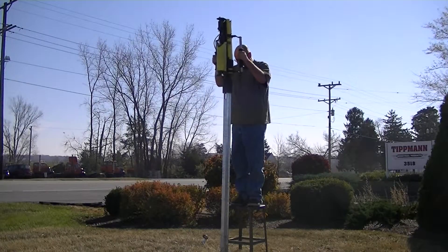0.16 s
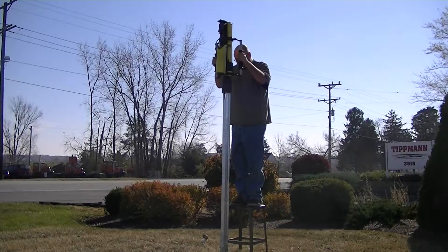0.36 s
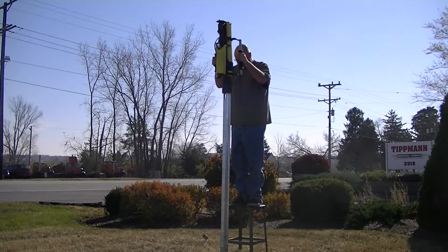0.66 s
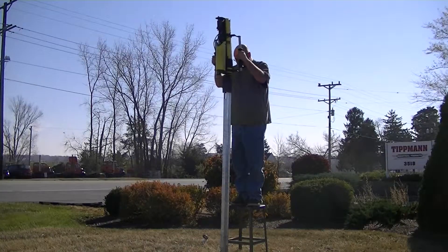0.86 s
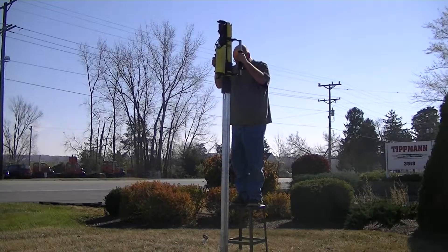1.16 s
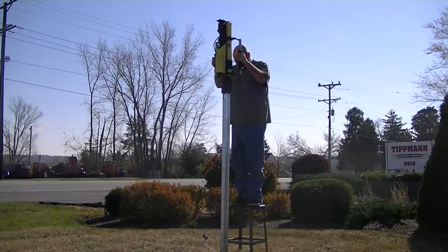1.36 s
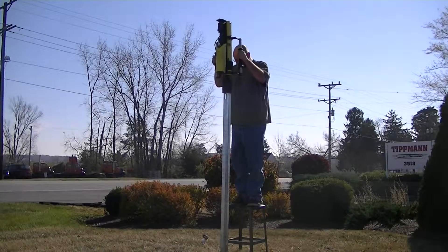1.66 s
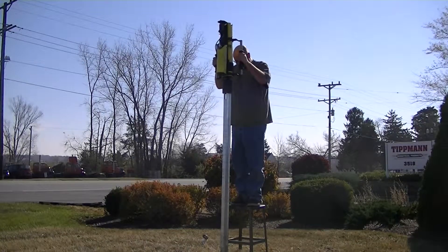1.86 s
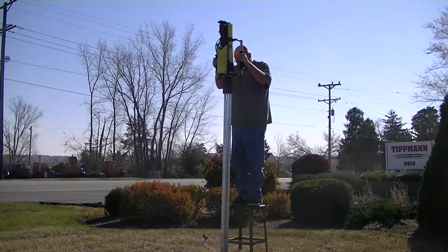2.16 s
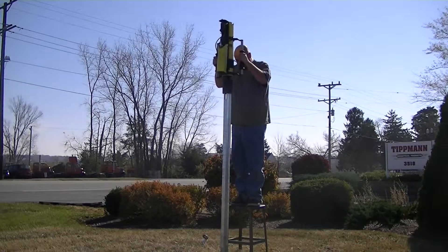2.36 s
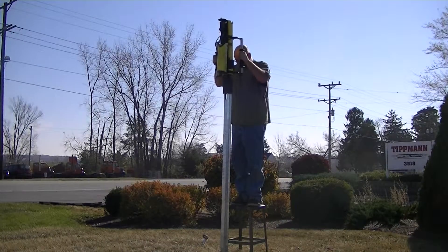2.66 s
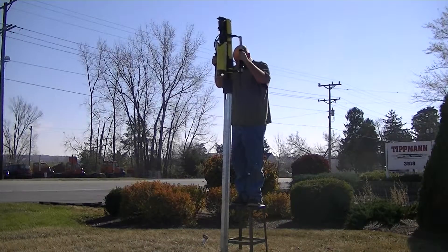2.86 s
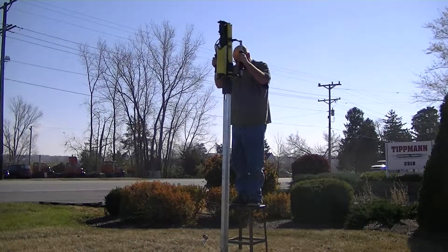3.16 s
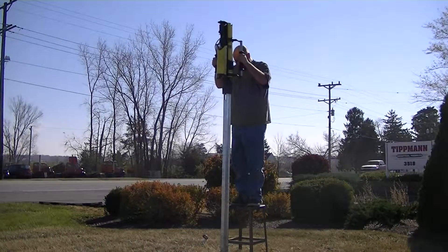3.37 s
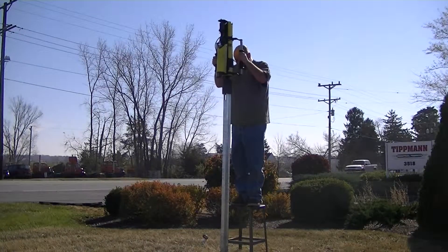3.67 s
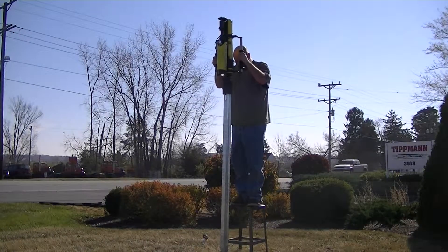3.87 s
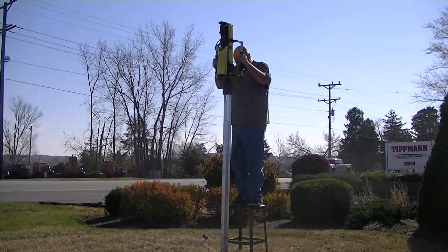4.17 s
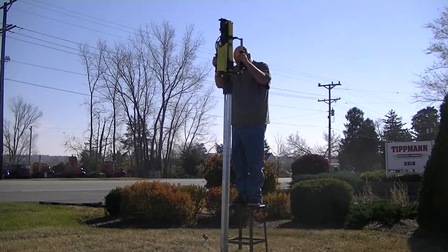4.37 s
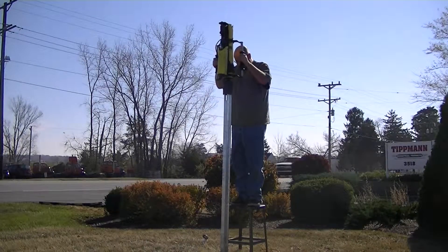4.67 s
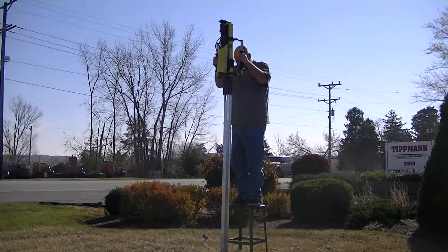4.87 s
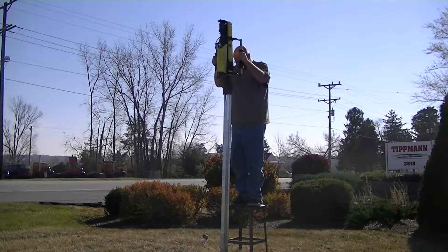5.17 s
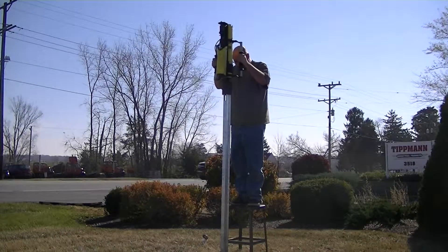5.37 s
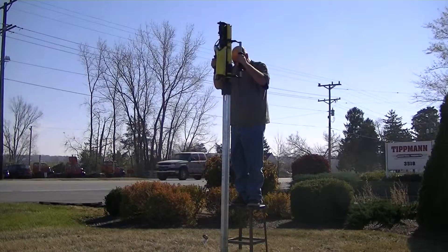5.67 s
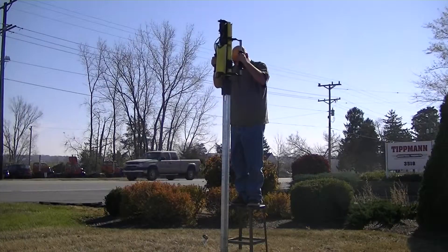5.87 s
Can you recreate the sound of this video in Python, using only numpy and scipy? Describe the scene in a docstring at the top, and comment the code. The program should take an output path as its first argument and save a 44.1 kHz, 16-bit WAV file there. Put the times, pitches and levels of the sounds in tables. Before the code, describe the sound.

Close outdoors on a lawn, a gas-powered driver pounds a steel pipe about three times a second. Each stroke has a brief gas intake, a hard explosive pop, bright steel ringing, a clank just after, then a hiss, small ticks and a thin jingle. The driver bounces lightly on the pipe between strokes. Faint traffic and dull building echoes lie behind; stereo leans right, with the loudest bangs slightly overloaded.

```python
"""Gas-powered post driver on a steel pipe

A post driver sits on a steel pipe on a lawn and fires about three times a second.
Each stroke: gas rushes in (swelling noise), the charge bangs (a pressure pulse and ringing exhaust modes), the
hammer rings the steel (beating modes), clanks back (ragged noise), and the chamber vents with a hiss.
The recoiling driver lands on the pipe and bounces, a small part jingles and one pipe mode sings on;
a building echoes the driver, and a road murmurs behind as slowly swelling noise."""
import sys
import numpy as np
from scipy import signal
from scipy.fft import rfft, irfft, next_fast_len
from scipy.io import wavfile
from scipy.ndimage import map_coordinates

SR = 44100
rng = np.random.default_rng(int(sys.argv[2]) if len(sys.argv) > 2 else 0)


def dump(signal):
    """Clip the signal to [-1, 1] and save it as 16-bit WAV at the path in sys.argv[1]."""
    limited = np.clip(np.atleast_2d(signal).T, -1, 1)
    pcm = np.round(limited * 32767).astype(np.int16)
    wavfile.write(sys.argv[1], SR, pcm)


N = 265482  # length in samples


def amp(db):
    """Decibels to gain."""
    return 10 ** (np.asarray(db) / 20)


def unit(x):
    """Scale to rms 1."""
    return x / np.sqrt(np.mean(x ** 2) + 1e-20)


def along(points, hz):
    """Read (Hz, value) points on a log frequency axis."""
    point_hz, values = np.transpose(points)
    return np.interp(np.log(hz + 1), np.log(point_hz), values)


def curve(rows):
    """One value per sample from (seconds, value) rows."""
    return np.interp(np.arange(N) / SR, *np.transpose(rows))


def wobble(rate, size=N):
    """A smooth random curve with rate knots a second."""
    knots = rng.standard_normal(int(size * rate / SR) + 4)
    return map_coordinates(knots, [np.arange(size) * rate / SR])


def filtered(x, response):
    """Shape x by a response of frequency, zero-padded so tails do not wrap."""
    m = next_fast_len(x.shape[-1] + SR // 8)
    spectrum = rfft(x, m) * response(np.fft.rfftfreq(m, 1 / SR))
    return irfft(spectrum, m)[..., :x.shape[-1]]


def fade(t, t60):
    """A decay of 60 dB in t60 seconds."""
    return np.exp(-np.log(1000) * t / max(t60, 1e-4))


def add(track, s, sound):
    """Mix a sound into the track at s seconds."""
    i = max(round(s * SR), 0)
    part = track[:, i:i + sound.shape[-1]]
    part += sound[..., :part.shape[1]]


# How alike the two channels of a noise are. Each row: frequency in Hz, correlation (1 is identical).
LIKENESS = [(100, 0.94), (700, 0.32), (2000, 0.66), (5000, 0.46), (9000, 0.91), (15000, 0.79)]


def noise(spectrum, size=N, ripple_db=0):
    """Coloured stereo noise of rms 1; ripple gives it a fresh set of resonant humps."""
    def mid_side_response(hz):
        turn = np.arccos(np.clip(along(LIKENESS, hz), -1, 1)) / 2
        humps = ripple_db * np.interp(hz, np.linspace(0, SR / 2, 160), rng.standard_normal(160))
        return amp(along(spectrum, hz) + humps) * [np.cos(turn), np.sin(turn)]

    mid, side = filtered(rng.standard_normal((2, size)), mid_side_response)
    return unit(np.array([mid + side, mid - side]))


def partials(modes, t, split_hz, scatter_db):
    """Modes as close, beating pairs that shift and change strength from blow to blow; about rms 1."""
    hz, level = np.tile(np.transpose(modes), 2)
    hz = hz + rng.normal(0, split_hz, len(hz))
    gains = amp(level + rng.normal(0, scatter_db, len(hz)))
    start = rng.random((len(hz), 1))
    waves = np.sin(2 * np.pi * (hz[:, None] * t + start))
    return gains @ waves / np.sqrt(np.sum(gains ** 2) / 2)


# The strokes, with levels ahead of each layer's own trim.
# Each row: start in seconds, bang in dB, exhaust pitch ratio, steel in dB, singing note in dB,
# hammer return delay in seconds, return in dB, vent length in seconds, vent in dB.
BLOWS = [ (0.096, -12, 0.95, -16, -32, .079, -17, 0.17, -28.5),
         (0.514, -11.5, 1.04, -15.5, -34, 0.071, -12, 0.069, -26.5),
         (0.9038, -11, 1.01, -13.5, -34.5, 0.078, -12, 0.25, -26),
         (1.3151, -13, 1.004, -16, -35.5, 0.073, -13.5, 0.24, -31),
         (1.6583, -13, 0.97, -12, -38, .075, -14, 0.25, -28.5),
         (1.9725, -12.5, 0.96, -13, -41, 0.071, -14, .23, -27.5),
         (2.318, -11, 0.99, -16, -41, 0.073, -15, 0.23, -28.5),
         (2.6357, -12.5, 1.03, -14, -33.5, 0.073, -12, 0.18, -29),
         (2.9042, -11.5, 1.03, -11, -33.5, 0.074, -14, .23, -29),
         (3.2794, -17.5, 1.01, -14, -39.5, 0.077, -14, 0.22, -29.5),
         (3.595, -13, 0.97, -12.5, -41.5, 0.072, -15, 0.24, -27),
         (3.9155, -12, 1.036, -13, -35.5, .072, -14.5, .25, -27.5),
         (4.404, -13.5, 0.98, -14.5, -31.5, 0.08, -14, .27, -26.5),
         (4.7988, -12, 1, -10.5, -34.5, .071, -13, .26, -27.5),
         (5.1673, -10, 1.03, -10.5, -47, 0.074, -15, .26, -29),
         (5.4543, -11.5, 1.03, -14.5, -32.5, 0.072, -12, .25, -26.5),
         (5.8033, -11, 1.046, -13, -33.5, 0.072, -12, 0.18, -28)]
# Gas ringing in the exhaust, nominal tuning. Each row: frequency in Hz, level in dB, 60 dB decay in seconds.
EXHAUST_MODES = [(199.4, -4, 0.023), (458.4, -5.5, 0.034), (600, -10, 0.02), (737, -6, 0.026),
                 (815, -39.5, 0.066)]
EXHAUST_SCATTER_DB = 1.8  # how far each exhaust resonance varies from bang to bang


def bangs(blast_db=17, blast_s=0.00052, ground_db=-16, ground_s=0.00246,
          exhaust_db=8, crack_db=1, crack_delay=.0006, lean_db=2):
    """Each charge sends out a blast wave, rings the exhaust and spits a short bright crack."""
    out, t = np.zeros((2, N)), np.arange(SR // 16) / SR
    lean = lean_db * np.array([[1], [-1]])  # stronger on the left
    for s, db, pitch, *_ in BLOWS:
        # a steep pulse, then a longer opposite swing of equal area
        u = t / (blast_s * rng.normal(1, .05))
        blast = amp(blast_db) * (1 - u ** 2) * np.exp(-u ** 2 / 2)
        pop = 0
        for hz, level, t60 in EXHAUST_MODES:
            gain = amp(level + EXHAUST_SCATTER_DB * rng.normal())
            tuned_hz = hz * pitch * rng.normal(1, 0.022)
            pop = pop + gain * fade(t, t60) * np.cos(2 * np.pi * tuned_hz * t)
        onset = 1 - np.exp(-t / .00008)
        bang = -amp(db + lean) * (blast + amp(exhaust_db) * pop) * onset
        add(out, s, bang)
        add(out, s + ground_s, amp(ground_db) * bang)  # the bounce off the lawn
        crack = noise(VENT_COLOUR, len(t)) * fade(t, 0.018)
        add(out, s + crack_delay, amp(db + crack_db) * crack)
    return filtered(out, hollow)


HOLLOW_HZ, HOLLOW_WIDTH_HZ = 91, 48  # centre and width


def hollow(hz):
    """A broad notch that hollows out the low bass of the bang."""
    detune = HOLLOW_HZ ** 2 - hz ** 2
    return detune / (detune + 1j * hz * HOLLOW_WIDTH_HZ)


# Strong hammer and pipe modes, nominal tuning. Each row: frequency in Hz, level in dB.
STEEL_MODES = [(1211, -3.5), (1663, -0.5), (2073, -6.5), (2295, -2.5), (2476, -8), (2982, -1.5), (4314, 2),
               (4797, -8), (5184, -18), (5892, -26), (6239, -2.5), (6430, -1.5), (6562, 4), (9157, 4),
               (9655, 1), (9805, 5), (10607, 5.5), (11310, -31), (12067, -14)]
# Colour of the weak pipe overtones and their wash. Each row: frequency in Hz, density in dB per Hz.
OVERTONE_COLOUR = [(60, -92), (130, 4.5), (300, -7.5), (550, -5.5), (1600, 1), (3000, -4), (3900, -8),
                   (5000, 1), (7500, -3.5), (9700, 6), (12000, 0), (13800, -14), (15500, -8)]
# a usual blow rings this long; a harder one seats the driver and dies sooner (dB of ring time per dB)
USUAL_BLOW_DB, USUAL_T60, SEATING = -13, 0.24, 1.32
TOP_HZ = 15900  # upper edge of the weak overtones, and of the recorder


def steel(ring_db=-4, dense_db=-6, wash_db=-7, crash_db=0, count=300):
    """The hammer lands just after the bang: strong pipe modes over many weak overtones."""
    out, t = np.zeros((2, N)), np.arange(SR // 3) / SR
    # the weak overtones belong to the pipe, so every blow rings the same ones
    weak_hz = np.linspace(500, TOP_HZ, count) + rng.normal(0, 35, count)
    waves = amp(along(OVERTONE_COLOUR, weak_hz))[:, None] * np.exp(2j * np.pi * weak_hz[:, None] * t)
    # the returning hammer damps the pipe
    damping = fade(np.maximum(t - .075, 0), 1.0)
    onset = 1 - np.exp(-t / 0.0004)
    for s, _, _, db, *_ in BLOWS:
        t60 = USUAL_T60 * amp(SEATING * (USUAL_BLOW_DB - db))
        strengths = rng.standard_normal(count) + 1j * rng.standard_normal(count)
        dense = amp(dense_db) * unit((strengths @ waves).real)
        ring = amp(ring_db) * partials(STEEL_MODES, t, split_hz=24.7, scatter_db=1.0)
        wash = amp(wash_db) * noise(OVERTONE_COLOUR, len(t))
        body = (ring + dense + wash) * fade(t, t60)
        crash = amp(crash_db) * noise(CLANK_COLOUR, len(t), ripple_db=7.5) * fade(t, 0.034)
        flight = rng.normal(.007, .0004)  # seconds from bang to blow
        add(out, s + flight, amp(db) * (body * damping + crash) * onset)
    return out


# Colour of the clank, also of the crash and ticks. Each row: frequency in Hz, density in dB per Hz.
CLANK_COLOUR = [(60, -38), (240, -37), (360, 3), (650, 3), (900, 5.5), (1900, 8.5), (3200, 3.5), (5000, -3),
                (7500, -10.5), (10000, -1.5), (12500, -3.5), (16000, -36)]


def returns(rise=0.0025, t60=.043, gain_db=1.5, ragged_db=3):
    """The hammer slides back against its stop with a ragged clank of noise."""
    out, t = np.zeros((2, N)), np.arange(SR // 8) / SR
    shape = np.minimum(t / rise, 1) ** 2 * fade(np.maximum(t - rise, 0), t60)
    for s, *_, delay, db, _, _ in BLOWS:
        level = amp(db + gain_db + ragged_db * wobble(895, len(t)))
        add(out, s + delay, level * shape * noise(CLANK_COLOUR, len(t), ripple_db=2.5))
    return out


# Colour of the gas hiss, also of cracks and bright knocks. Each row: frequency in Hz, density in dB per Hz.
VENT_COLOUR = [(100, -16), (280, -11), (420, 3), (900, 0.5), (2000, 2), (3500, 2), (5500, -3.5), (6550, 0),
               (7400, -9.5), (9900, 6), (11000, -1), (12500, -2), (13700, -10.5), (15300, -8)]
# opening time, loss of flow, 60 dB decay once shut
VENT_ATTACK_S, VENT_SAG_DB_PER_S, VENT_T60 = .037, 9.5, 0.072


def gas(intake_db=-24, vent_db=-3, flutter_db=2.5, surge_db=2.9):
    """Gas swells through the valve before the bang, then vents as noise until the valve shuts."""
    out, t = np.zeros((2, N)), np.arange(SR // 2) / SR
    lead = .018  # seconds of intake before the bang
    swell = np.minimum(t / lead, 1) * fade(np.maximum(t - lead, 0), 0.02)
    for s, *_ in BLOWS:
        add(out, s - lead, amp(intake_db) * swell * noise(VENT_COLOUR, len(t)))
    for s, length, db in outflows():
        flow = np.minimum(t / VENT_ATTACK_S, 1) * fade(np.maximum(t - length, 0), VENT_T60)
        level = amp(db + vent_db - VENT_SAG_DB_PER_S * t)
        add(out, s, level * flow * noise(VENT_COLOUR, len(t), ripple_db=3.0))
    return out * amp(flutter_db * wobble(81) + surge_db * wobble(20))


# Extra gushes of gas while the driver gets going, ahead of the vent trim.
# Each row: start in seconds, length in seconds, level in dB.
EXTRA_GUSHES = [(.305, 0.127, -27), (.68, 0.089, -22.5)]


def outflows():
    """Every release of gas: (start s, length s, untrimmed dB)."""
    vents = [(s, length, db) for s, *_, length, db in BLOWS]
    return vents + list(EXTRA_GUSHES)


# The driver's mechanism clicks dully as it is set for a stroke. Each row: start in seconds, level in dB.
SETTING_CLICKS = [(.011, -29.5), (.066, -26.5), (.453, -25), (.872, -18), (1.262, -22), (4.275, -32),
                  (4.346, -25.5), (4.77, -26)]
# The recoil lifts the driver, which lands on the pipe once or twice, about 0.2 s after the bang.
# Each row: start in seconds, clatter in dB, bright hiss in dB.
RECOIL_LANDINGS = [(.31, -23.5, -19), (.331, -25, -15), (.678, -13.5, -13.5), (1.08, -28, -29),
                   (1.516, -21, -15), (1.84, -25.5, -24.5), (2.171, -33, -24), (2.498, -48, -27),
                   (2.79, -42, -22.5), (2.836, -34, -16), (3.09, -34, -19), (3.481, -30, -39),
                   (3.801, -30.5, -33), (4.089, -29, -25), (4.129, -27, -24), (4.634, -31, -19),
                   (5.004, -20.5, -15.5), (5.356, -27, -21.5), (5.999, -22, -20)]
BOUNCE_S, BOUNCE_DB = .042, -9.5  # each landing bounces once: flight and loss


def rattles(click_hiss_db=-26, tick_db=-2, tick_spread_db=2, tick_t60=0.03, count=7):
    """The driver clicks before a stroke, ticks against the pipe as it vents, then lands and bounces."""
    out, t = np.zeros((2, N)), np.arange(SR // 16) / SR
    for s, db in SETTING_CLICKS:
        add(out, s, knock(db, db + click_hiss_db))
    for s, db, hiss_db in RECOIL_LANDINGS:
        add(out, s, knock(db, hiss_db))
        add(out, s + BOUNCE_S, amp(BOUNCE_DB) * knock(db, hiss_db))
    for s, *_, length, vent_db in BLOWS:
        for share in rng.random(count):
            tick = noise(CLANK_COLOUR, len(t), ripple_db=10) * fade(t, tick_t60)
            level = amp(vent_db + tick_db + tick_spread_db * rng.normal())
            add(out, s + share * length, level * tick)
    return out


# Colour of the knocking clatter. Each row: frequency in Hz, density in dB per Hz.
RATTLE_COLOUR = [(120, -15), (290, -32), (410, 2), (1150, -1), (1950, 10.5), (2650, 2.5), (3450, 0),
                 (4200, -24), (7200, -51)]


def knock(clatter_db, hiss_db, knock_db=-3, knock_t60=0.014, after_db=-8, after_t60=0.14, ragged_db=4.5):
    """Steel knocks on steel once, then chatters on more quietly."""
    t = np.arange(SR // 4) / SR
    clatter = amp(clatter_db) * noise(RATTLE_COLOUR, len(t), ripple_db=4)
    hiss = amp(hiss_db) * noise(VENT_COLOUR, len(t), ripple_db=8.0)
    hit = amp(knock_db) * fade(t, knock_t60)
    chatter = amp(after_db + ragged_db * wobble(300, len(t))) * fade(t, after_t60)
    return (clatter + hiss) * (hit + chatter) * (1 - np.exp(-t / 0.00092))


# Modes of a small loose part, nominal tuning. Each row: frequency in Hz, level in dB.
LOOSE_PART_MODES = [(8150, 0), (9830, -21), (9940, 22), (10050, -22), (14400, 1), (15380, -6)]
JINGLE_DELAY_S, JINGLE_DB = 0.0235, -7.5  # after the valve shuts; against the untrimmed vent level


def jingles(t60=0.098):
    """A small loose part rings thin and high, hanging on after the valve shuts."""
    out, t = np.zeros((2, N)), np.arange(SR // 4) / SR
    shape = fade(t, t60) * (1 - np.exp(-t / 0.0059))
    for s, length, db in outflows():
        ring = partials(LOOSE_PART_MODES, t, split_hz=53.5, scatter_db=4) * shape
        add(out, s + length + JINGLE_DELAY_S, amp(db + JINGLE_DB) * ring)
    return out


NOTE_HZ, NOTE_T60 = 970, 1.06  # settled centre pitch and free ring time of the pipe's long note


def singing(return_db=-6, landing_db=-16, attack_s=0.0013, waver_hz=4, sharp_hz=10, sharp_t60=0.201,
            choke_t60=0.07, beat_db=2):
    """Blow, return and landing each feed one lightly damped pipe mode, until the next blow chokes it."""
    power, sharp, t = np.zeros((1, N)), np.zeros((1, N)), np.arange(SR // 2) / SR
    contacts = [(s, db + landing_db) for s, db, _ in RECOIL_LANDINGS]
    for s, _, _, _, db, delay, *_ in BLOWS:
        contacts += [(s, db), (s + delay, db + return_db)]
        add(sharp, s, sharp_hz * fade(t, sharp_t60))  # the note starts a little sharp and settles
    for s, db in contacts:
        free_s = min([blow - s for blow, *_ in BLOWS if blow > s], default=1)
        choke = fade(np.maximum(t - free_s, 0), choke_t60)
        shape = (1 - np.exp(-t / attack_s)) * fade(t, NOTE_T60) * choke
        add(power, s, (amp(db) * shape) ** 2)
    pitch_hz = NOTE_HZ + sharp[0] + waver_hz * wobble(24.7)
    phase = 2 * np.pi * np.cumsum(pitch_hz) / SR
    return np.sqrt(power) * amp(beat_db * wobble(21.89)) * unit(np.sin(phase))


# Echoes from a building. Each row: delay in seconds, level in dB.
BUILDING_ECHOES = [(0.141, -27), (.147, -17)]


def yard(x, tail_db=-29, tail_t60=0.2):
    """A building sends back two dull echoes; shrubs and trees scatter a faint tail."""
    out, t = np.zeros((2, N)), np.arange(SR // 2) / SR
    dull = filtered(x, lambda hz: hz / (hz + 200) / (1 + (hz / 520) ** 6))
    for delay, db in BUILDING_ECHOES:
        add(out, delay, amp(db) * dull)
    tail_colour = [(100, 6), (450, -45), (2000, 32), (10000, -66)]  # Hz, dB
    tail = noise(tail_colour, len(t)) * fade(t, tail_t60)
    scattered = signal.fftconvolve(x, tail / np.linalg.norm(tail[0]), axes=1)[:, :N]
    return out + amp(tail_db) * scattered


# Loudness of the road ahead of its random swell. Each row: time in seconds, level in dB.
ROAD_LEVEL = [(0, -39), (1.2, -40), (2.3, -44), (3.2, -45), (4.3, -43.5), (5.1, -40), (6.02, -42.5)]
# Colour of the traffic. Each row: frequency in Hz, density in dB per Hz.
TRAFFIC_COLOUR = [(32, -22), (75, -10.5), (165, 1), (300, -11.5), (430, -2), (640, -5.5), (1050, -2),
                  (2250, -5.5), (4100, -14), (6400, -22), (7600, -28), (10100, -24), (14500, -39)]


def road(swell_db=-1.8):
    """Traffic murmurs beyond the hedge as coloured noise with gentle swells."""
    return amp(curve(ROAD_LEVEL) + swell_db * wobble(5.49)) * noise(TRAFFIC_COLOUR)


# Tone balance of the two microphones. Each row: frequency in Hz, left minus right in dB.
MIC_BALANCE = [(60, -12), (400, -12), (1600, -6), (2100, -2.5), (2500, -2), (3100, -6.5), (4900, -4),
               (5800, -1), (6500, -5), (8000, -0.5), (15000, -3)]


def scene():
    """The driver and its echoes over the road, all tilted towards the right microphone."""
    driver = bangs() + steel() + returns() + gas() + rattles() + jingles() + singing()
    both = driver + yard(driver) + road()
    return filtered(both, lambda hz: amp(np.outer([1, -1], along(MIC_BALANCE, hz)) / 2))


def record(dry, top=0.64, bass_hz=75):
    """The bangs overload the input smoothly; the recorder then trims deep bass and high treble."""
    squashed = dry / (1 + (dry / top) ** 4) ** (1 / 4)

    def trim(hz):
        bass_cut = (1j * hz / (bass_hz + 1j * hz)) ** 2
        return bass_cut * (hz < TOP_HZ)

    return filtered(squashed, trim)


dry = scene()
out = record(dry)
dump(out)
```